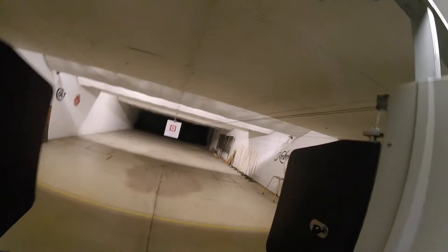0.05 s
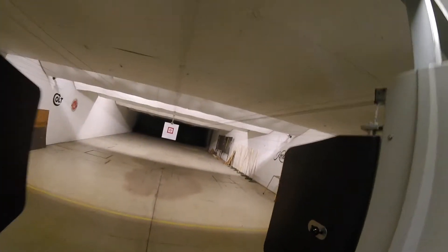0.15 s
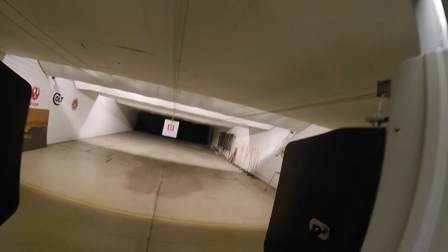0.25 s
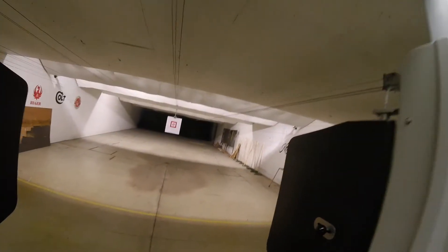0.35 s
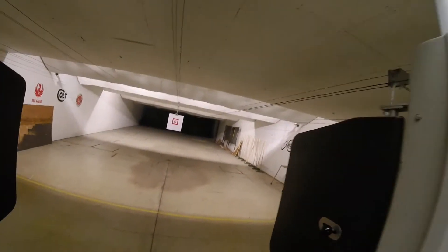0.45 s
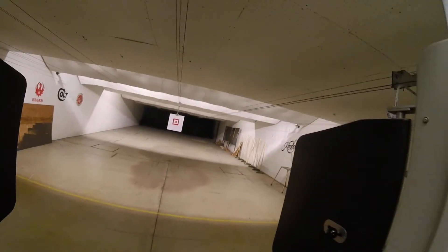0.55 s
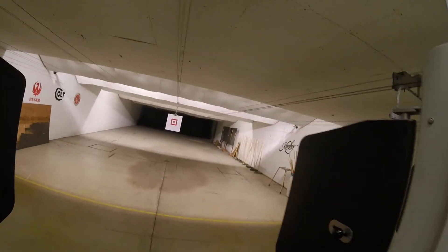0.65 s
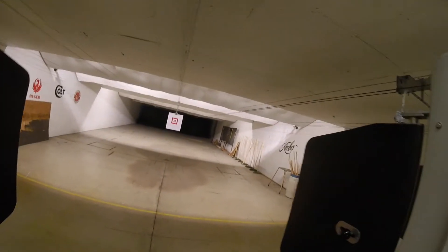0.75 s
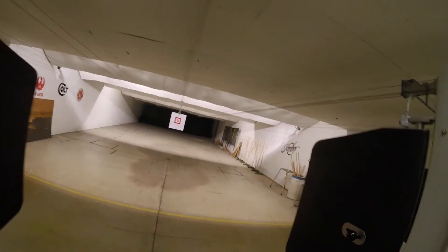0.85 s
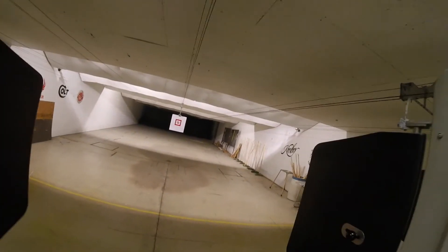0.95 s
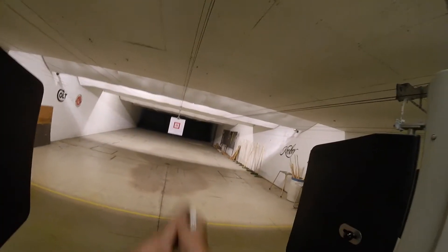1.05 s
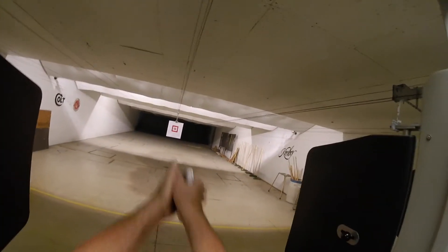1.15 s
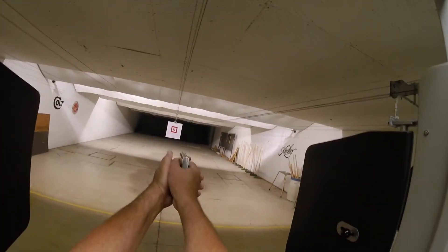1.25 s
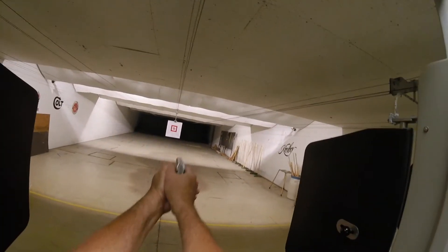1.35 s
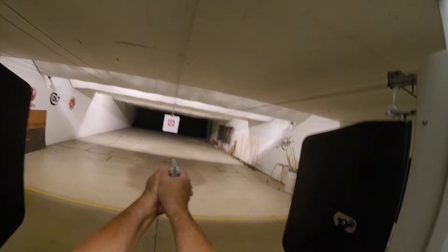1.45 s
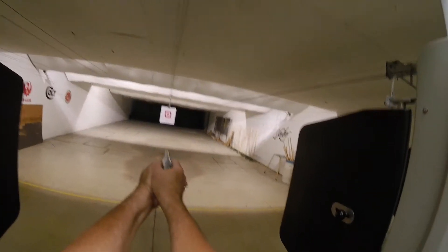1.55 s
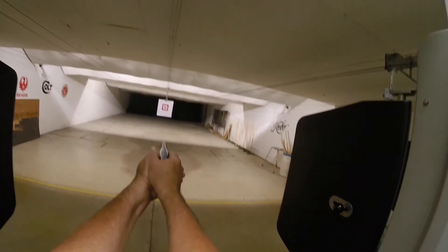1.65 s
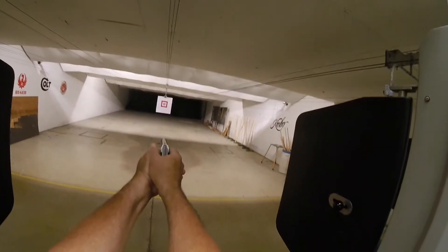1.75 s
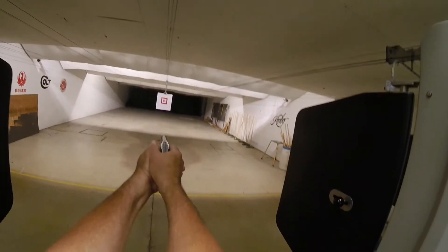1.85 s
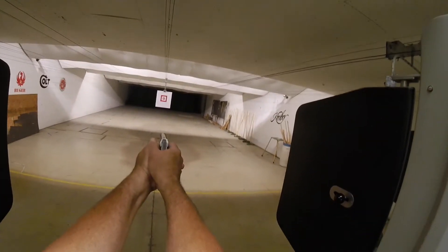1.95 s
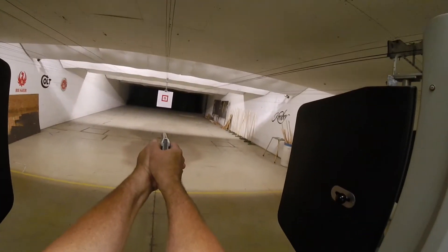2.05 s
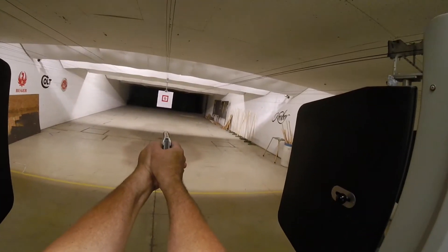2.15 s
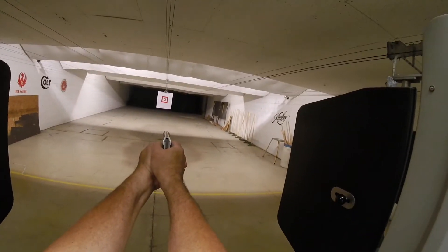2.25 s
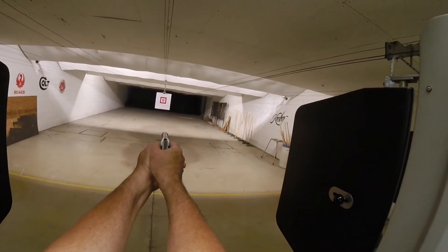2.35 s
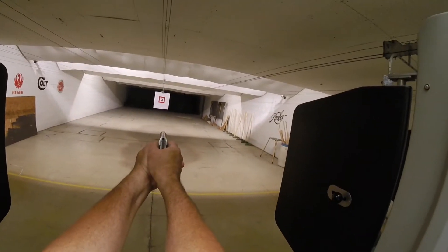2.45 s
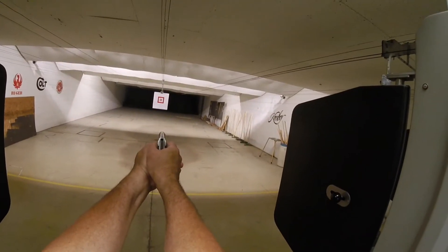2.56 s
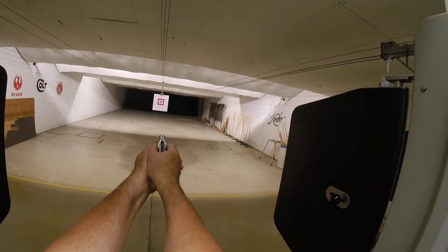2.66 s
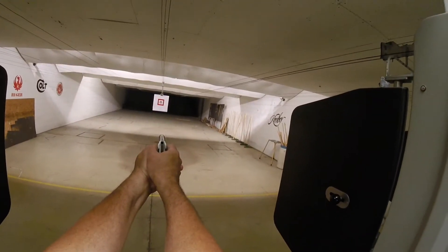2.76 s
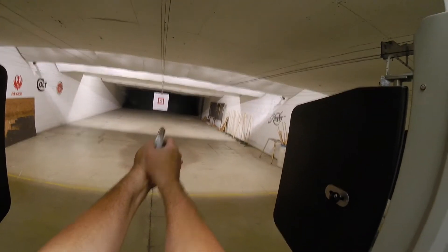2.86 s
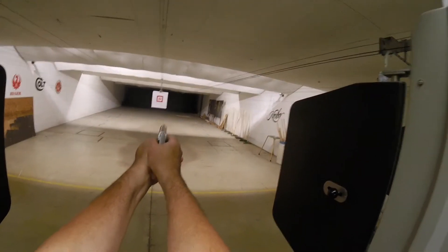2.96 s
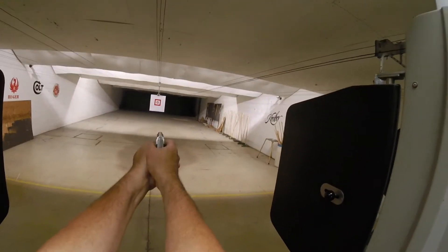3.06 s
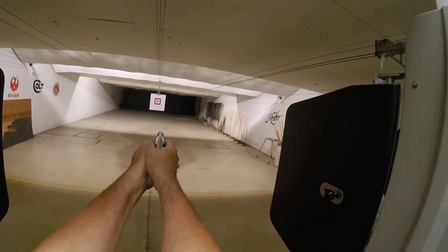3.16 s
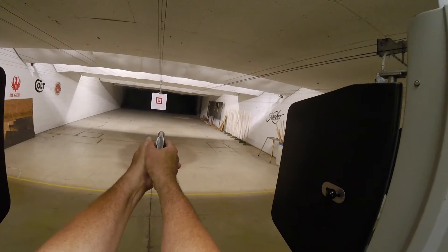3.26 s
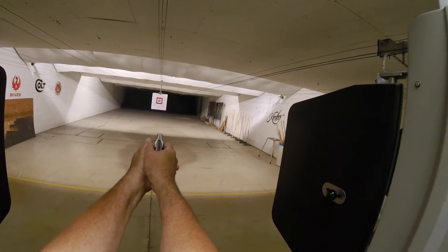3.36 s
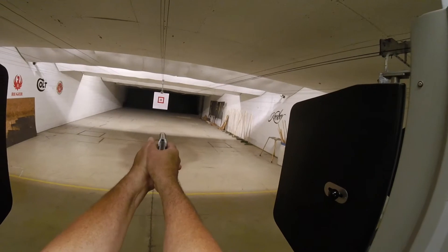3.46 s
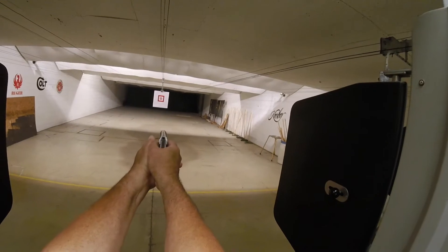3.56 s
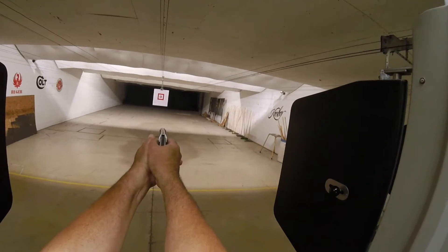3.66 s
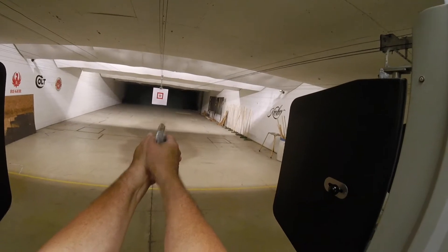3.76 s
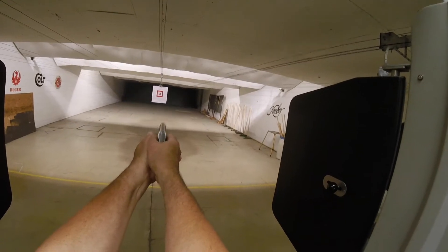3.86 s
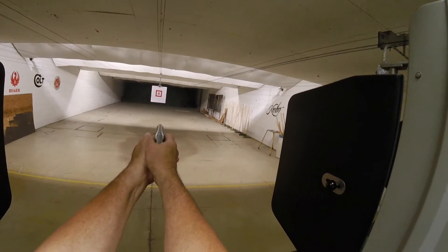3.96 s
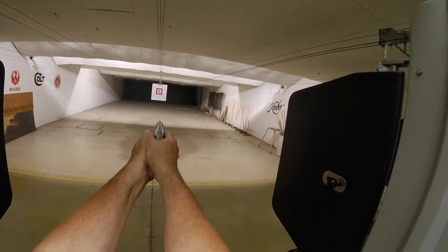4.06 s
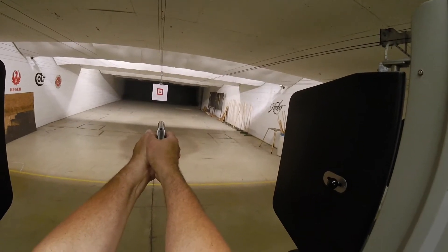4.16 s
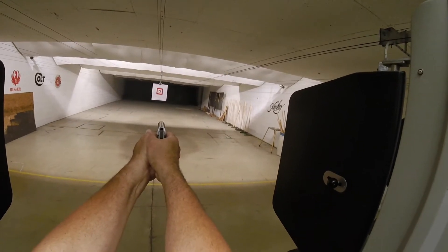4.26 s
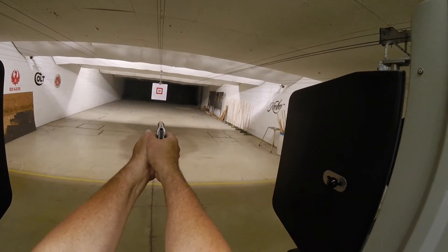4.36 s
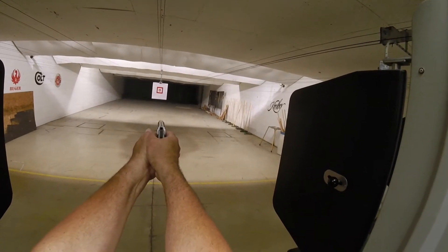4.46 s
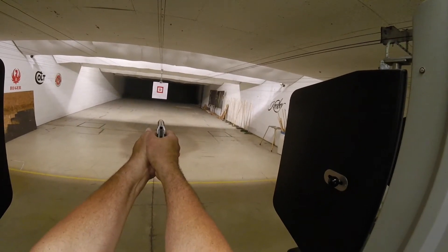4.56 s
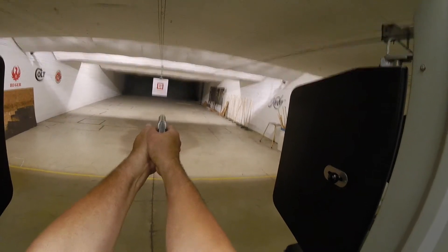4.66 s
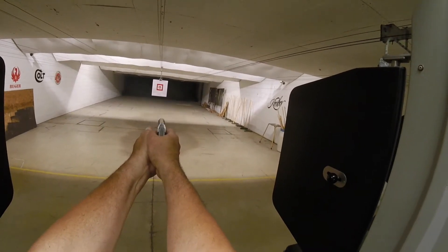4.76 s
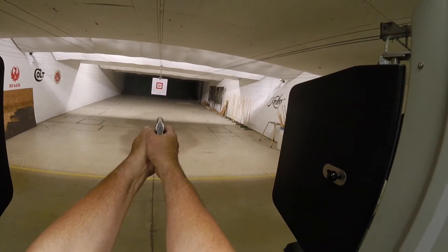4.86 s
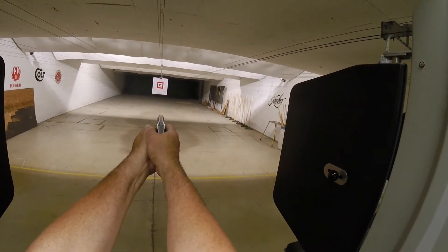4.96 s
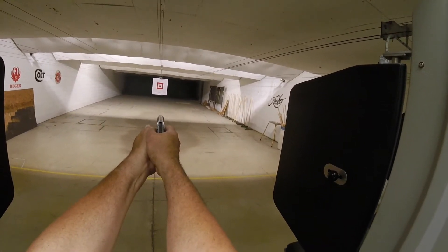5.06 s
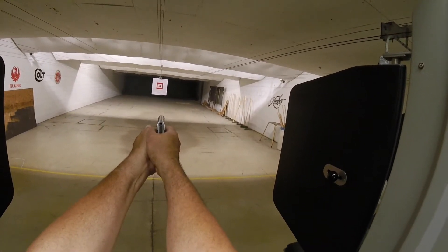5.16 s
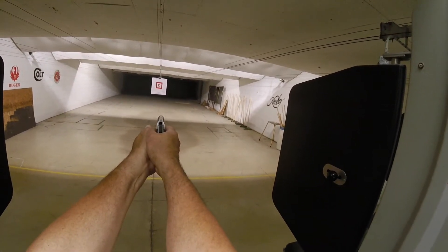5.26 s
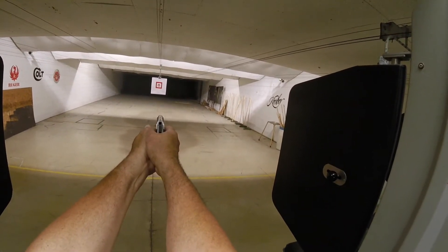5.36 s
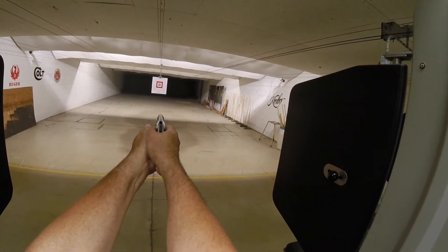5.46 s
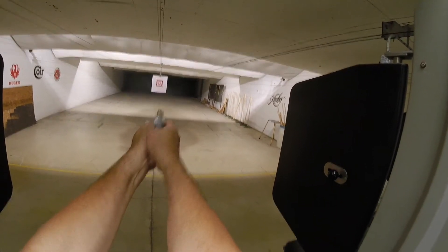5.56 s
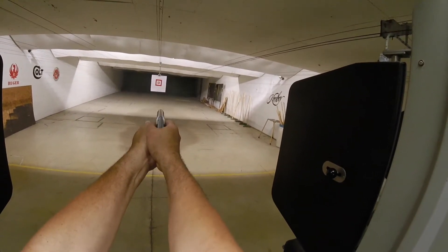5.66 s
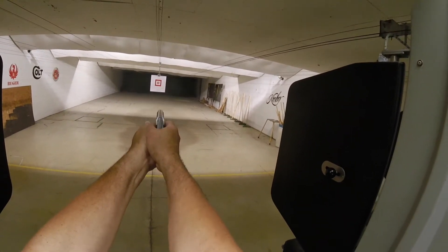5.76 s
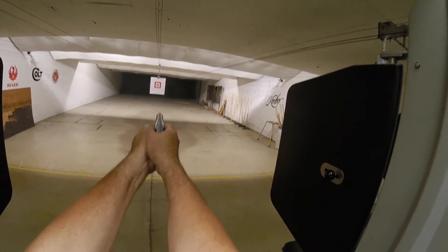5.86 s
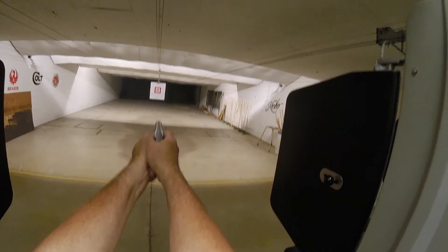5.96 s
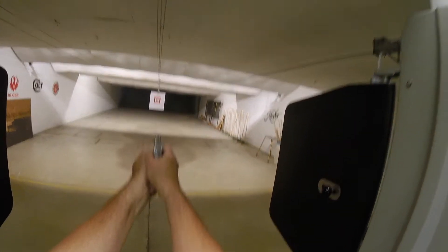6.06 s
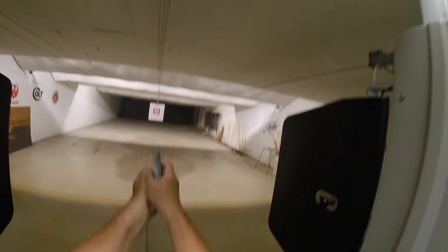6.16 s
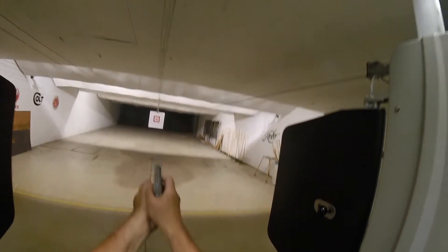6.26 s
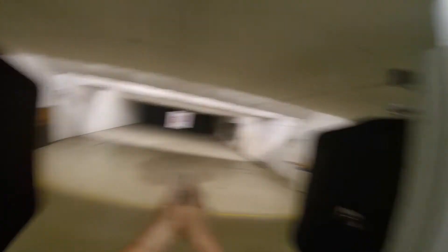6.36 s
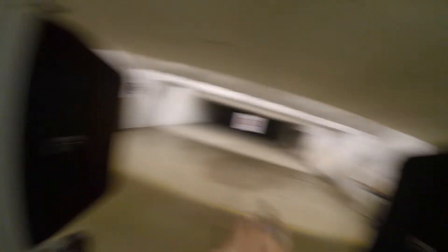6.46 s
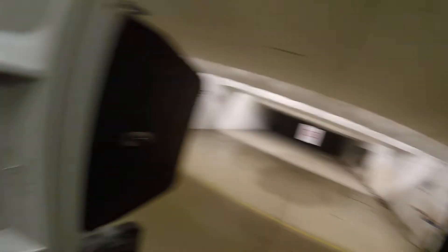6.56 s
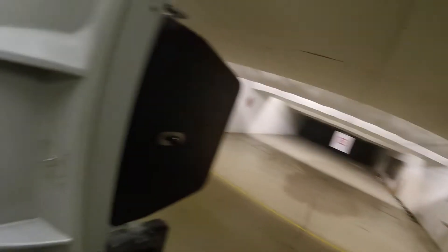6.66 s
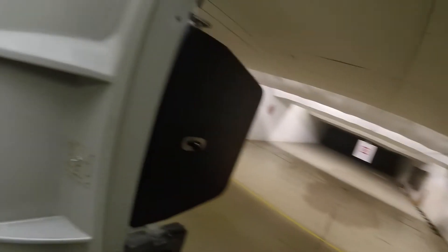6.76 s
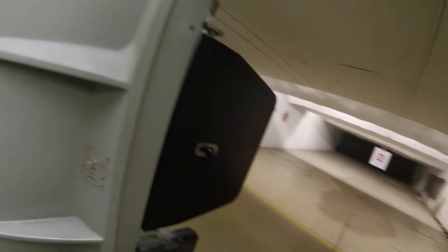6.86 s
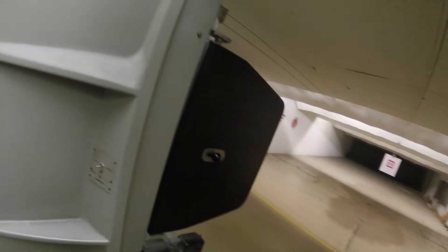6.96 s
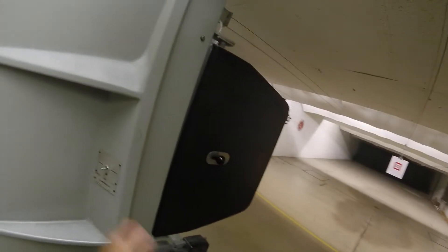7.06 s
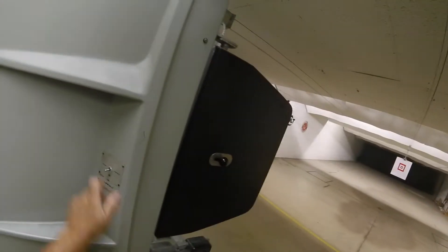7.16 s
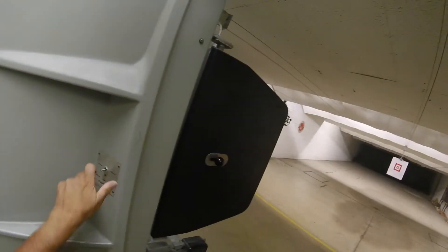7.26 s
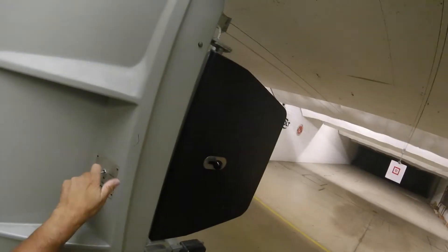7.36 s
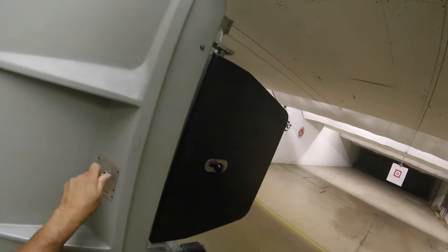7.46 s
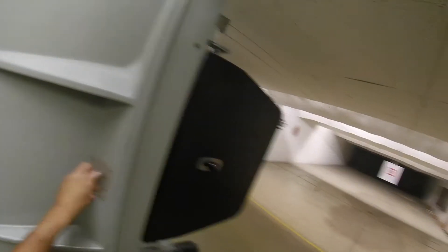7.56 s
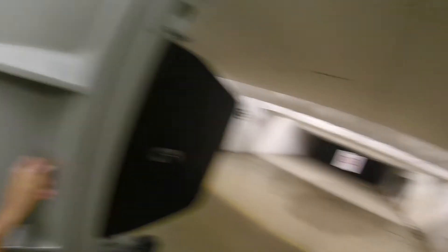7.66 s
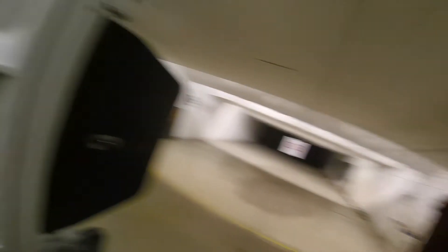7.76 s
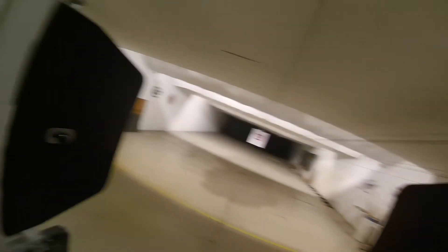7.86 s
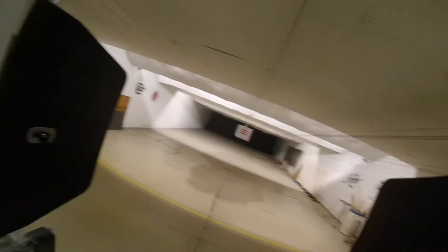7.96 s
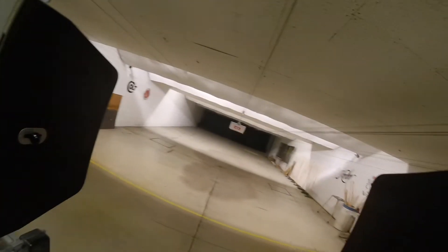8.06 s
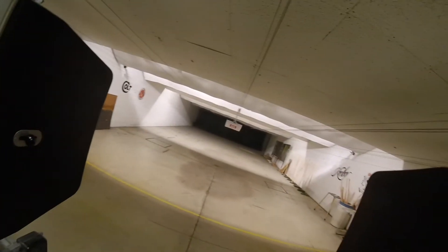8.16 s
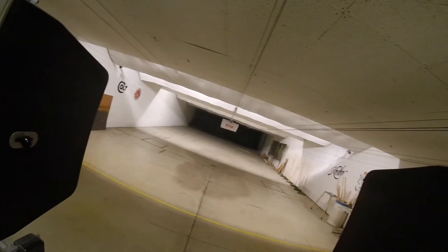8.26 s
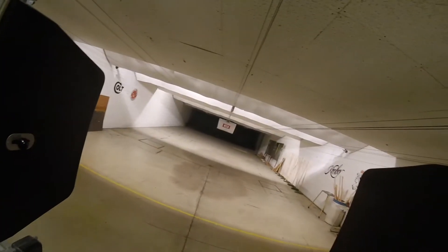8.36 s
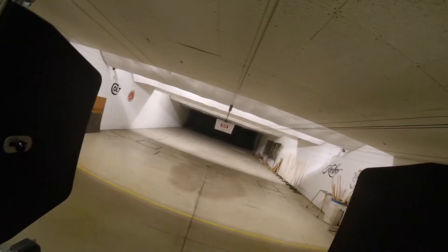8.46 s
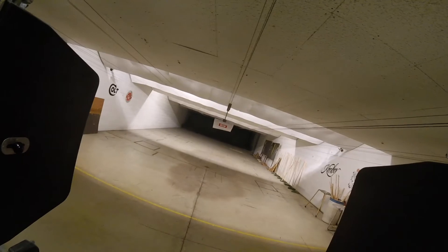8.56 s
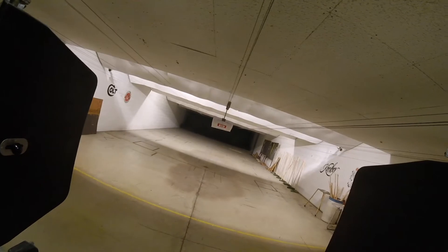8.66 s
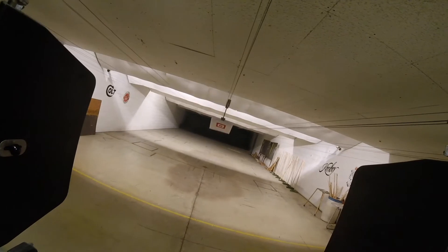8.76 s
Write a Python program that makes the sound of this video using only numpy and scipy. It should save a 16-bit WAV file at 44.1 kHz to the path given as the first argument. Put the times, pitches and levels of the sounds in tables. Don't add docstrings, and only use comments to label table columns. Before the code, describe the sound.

Inside a long concrete shooting range, a head-worn camera hears low ventilation rumble and soft hiss. After nearly three seconds a small pistol fires four evenly spaced shots, each ducking the background just before a hard, slightly squashed crack and a roar that rolls down the hall. Small clacks follow as the gun is put down, with faint high brass ringing, then a wall switch snaps and an electric motor runs up to a steady whirr.

```python
import sys
import numpy as np
from scipy import signal
from scipy.fft import rfft, irfft
from scipy.io import wavfile
from scipy.ndimage import uniform_filter1d

SR = 44100
rng = np.random.default_rng(int(sys.argv[2]) if len(sys.argv) > 2 else 0)


def voltage_ratio(level):
    return 10 ** (np.asarray(level, float) / 20)


def to_wav(sig):
    pcm = np.clip(np.atleast_2d(sig), -1, 1) * 32767
    pcm = np.round(pcm).astype(np.int16)
    wavfile.write(sys.argv[1], SR, pcm.T)


N = 388080
T = np.arange(N) / SR

# frequency in Hz, level in dB per Hz.
AIR_COLOUR = [(11, -21), (18, 1.5), (66, -8.5), (137, -18.5), (247, -28), (470, -37), (830, -43.5),
              (2000, -48.5), (3300, -54), (4500, -59), (7500, -50.5), (10000, -59.5), (12500, -59),
              (13500, -104)]
# time in seconds, level in dB.
DRAUGHT = [(0, -3), (.7, -1), (1.4, -2.5), (2.1, 0.5), (2.8, -1.5), (6.5, -4.5), (7.2, -3), (8.0, -1.5),
           (8.8, 0)]
HISS_DB = 0.25

# start in seconds, hold in seconds, level in dB, colour in Hz, dying in dB per second.
SCRAPES = [
    (0.616, 0.043, -68, 1900, 500),
    (6.847, 0.063, -46.5, 3300, 188),
    (7.198, 0.061, -68.5, 1500, 99.5),
]
SCRAPE_RISE_DB_S = 2500
SCRAPE_ROOM_DB, SCRAPE_ROOM_DB_S = -11, 54.5

# time in seconds, peak in dB, colour
# in Hz, low part in dB, time to die by 60 dB in seconds.
KNOCKS = [(1.29, -54.5, 6600, -14, 0.028), (2.6714, -51.5, 6660, -15, 0.022),
          (5.1092, -49, 2730, -12.5, 0.032), (5.3453, -37.5, 2940, -3, 0.066),
          (6.1584, -39, 3680, -7, 0.035), (6.2944, -51, 2620, 5, 0.031), (6.5126, -46, 5850, -6, 0.081),
          (6.5655, -47, 3040, -6, 0.039), (6.6472, -38, 3200, -5, 0.05), (6.6554, -40.5, 6300, -21, 0.18),
          (6.7703, -46.5, 2920, 0, 0.11), (6.7994, -50.5, 2710, -2, 0.032), (6.847, -43, 3450, -8, 0.05),
          (7.637, -45, 5880, -20.5, 0.045), (7.6488, -56, 4010, -18, 0.039),
          (7.7142, -43, 2830, -16, 0.042), (7.7191, -45.5, 2770, 10.5, 0.041),
          (7.8354, -48.5, 3020, -11, 0.038)]

# time in seconds, peak in dB, low thump in dB.
SHOTS = [
    (2.867, -12, -25.5),
    (3.788, -11.5, -28),
    (4.656, -12, -24.5),
    (5.578, -12, -18.5),
]
# frequency in Hz, level in dB per Hz.
CRACK_COLOUR = [(880, -31), (1500, -7), (2730, -0.5), (5360, 2), (6650, 3), (8670, -6.5), (10400, -24),
                (12100, -24.5), (15600, -46.5)]
# frequency in Hz, level in dB per Hz.
BOOTH_COLOUR = [(88, -25), (150, 5), (650, 0), (1480, 6), (2530, -9.5), (3210, -6.5), (4710, -11.5),
                (5160, -11), (6430, -10.5), (7590, -23.5), (8320, -20), (10400, -34.5), (12000, -38),
                (15600, -67.5), (22000, -120)]
# frequency in Hz, level in dB, time to die by 60 dB in seconds.
PANELS = [(353, -8, 0.039), (640, -8, 0.042), (1040, -3.5, 0.022), (1448, 4, 0.018), (2054, -9.5, 0.038),
          (2970, -8, 0.018)]
# frequency in Hz, level in dB per Hz.
HALL_COLOUR = [(24, -78), (40, -36.5), (62, -12), (81, -11.5), (162, -8.5), (202, -13.5), (251, -12),
               (453, -4.5), (654, -4.5), (945, -3), (2120, -15.5), (6240, -23), (8790, -36.5),
               (14000, -80.5)]
# frequency in Hz, time to die by 60 dB in seconds.
HALL_T60 = [(60, 0.86), (250, 1.92), (700, 1.544), (1500, 1.573), (3000, 1.393), (6000, 1.27), (8000, 0.77),
            (10500, 1.6), (13000, 0.3)]
SAME = 0.96

DIVE_S = [
    2.808,
    3.7355,
    4.6005,
    5.528,
]
START_DB, DEPTH_DB, SPRING_DB = -4.5, -44, -3.5
RECOVER_S = 0.78

# start in seconds, level in dB, length in seconds.
BRASS_RINGS = [
    (6.507, -75, .12),
    (6.643, -72, 0.1),
    (6.762, -67, .25),
]

# time in seconds, level in dB.
TOGGLE = [
    (7.637, -51),
    (7.648, -54),
    (7.716, -41.5),
]
# frequency in Hz, level in dB, time to die by 60 dB in seconds.
SWITCH_PLATE = [(286, 0.5, 0.058), (795, -15, 0.077), (1350, -15, 0.08), (2780, -11, .04),
                (4960, -11, 0.023)]

# frequency in Hz, width in Hz, level in dB.
HUM = [(109.7, 4, -7), (171.4, 12, -1), (199, 25, -5.5), (414, 12, -13.5), (509, 22.5, -0.5),
       (537, 19, -2.5), (620, 15, -11.5), (707, 16, -15), (753, 11, -10), (955, 38, -29)]
# frequency in Hz, width in Hz, level in dB.
WHIRR = [(1513, 42, -6), (1824, 48, -4.5), (2004, 31, -6.5), (2205, 44, -5.5), (2626, 38, 1),
         (3226, 77, -5), (3760, 110, -10), (4215, 85, -2.5), (5300, 78, -6), (5910, 90, -12),
         (6430, 70, -9), (7640, 83, -11), (8400, 70, -19), (9800, 60, -17)]
# frequency in Hz, level in dB per Hz.
RATTLE_COLOUR = [(350, -39), (600, -22), (1100, -12), (1820, -1.5), (2390, -8.5), (2630, 1.5),
                 (3950, -13.5), (4160, -13.5), (4880, -8.5), (6350, -13.5), (9060, -18), (14000, -64)]
MOTOR_ON_S, RUN_UP_S = 7.75, 0.2
HUM_DB, HUM_SLOPE_DB, HUM_WOBBLE_DB = -42.5, 16, 0.8
WHIRR_DB, WHIRR_SLOPE_DB, WHIRR_BRIGHT = -37, 90, 0.39
JOLT_DB, JOLT_T60_S = -56.5, 0.25


def level(x, db):
    return x * voltage_ratio(db) / np.sqrt(np.mean(x ** 2))


def read(table, hz):
    table_hz, value = np.transpose(table)
    return np.interp(np.log(hz + 1), np.log(table_hz), value)


def tint(x, table):
    size = x.shape[-1]
    gain = voltage_ratio(read(table, np.fft.rfftfreq(size, 1 / SR)))
    return level(irfft(rfft(x) * gain, size), 0)


def ring(x, hz, width_hz):
    return signal.lfilter(*signal.iirpeak(hz, hz / width_hz, fs=SR), x)


def dull(x, hz):
    return signal.sosfilt(signal.butter(4, hz, fs=SR, output="sos"), x)


def bands(x, top=16.0):
    size = x.shape[-1]
    spectrum = rfft(x)
    octaves = np.log2(np.fft.rfftfreq(size, 1 / SR) + 1)
    for octave in np.arange(4, top, 0.5):
        share = np.clip(1 - 2 * abs(octaves - octave), 0, 1)
        yield 2 ** octave, irfft(spectrum * share, size)


def walk(rate):
    k = int(SR / rate)
    steps = np.repeat(rng.standard_normal(N // k + 1), k)
    return 1.3 * uniform_filter1d(uniform_filter1d(steps, k), k)[:N]


def fade(t, t60):
    return (t >= 0) * np.exp(-np.log(1000) * np.maximum(t, 0) / t60)


def tones(table, t):
    return sum(voltage_ratio(db) * np.sin(2 * np.pi * hz * t) * fade(t, t60) for hz, db, t60 in table)


def add(out, s, x):
    i = int(s * SR)
    out[i:i + len(x)] += x[:N - i]


def leveller_db():
    db = START_DB * np.exp(-T / 1.0)
    for dive_s, (s, _, _) in zip(DIVE_S, SHOTS):
        since = np.maximum(T - s - 0.006, 0)
        dive_db = DEPTH_DB * np.exp(-since / RECOVER_S) + SPRING_DB * np.exp(-since / 0.0061)
        db = np.where(T >= dive_s, dive_db, db)
    return uniform_filter1d(db, int(0.0023 * SR))


def air():
    s, rumble_db = np.transpose(DRAUGHT)
    whole = tint(rng.standard_normal(N), AIR_COLOUR)
    gust = walk(5)
    whole = whole + voltage_ratio(4.5) * ring(whole, 6620, 250)
    rumble, hiss = 0, whole
    for hz, band in bands(whole, top=9.1):
        hiss = hiss - band
        buffet_db = np.clip(150 / hz, 0, 1) * (0.64 * gust + 2.0 * walk(10))
        rumble = rumble + band * voltage_ratio(buffet_db)
    moving_air = rumble * voltage_ratio(np.interp(T, s, rumble_db)) + hiss * voltage_ratio(HISS_DB)
    mains = voltage_ratio(-48.5 + 2.7 * walk(3.2)) * np.sin(2 * np.pi * 59.5 * T)
    return voltage_ratio(-39.5) * moving_air + mains


def scrapes():
    out = np.zeros(N)
    grit = rng.standard_normal(N) * voltage_ratio(1.8 * rng.exponential(size=N) + 1.0 * walk(90))
    for s, hold, db, hz, dying in SCRAPES:
        after = np.maximum(T - s - hold, 0)
        rub_db = db - SCRAPE_RISE_DB_S * np.maximum(s - T, 0) - dying * after
        room_db = db + SCRAPE_ROOM_DB - SCRAPE_ROOM_DB_S * after
        out += level(ring(grit, hz, 1.6 * hz), 0) * (voltage_ratio(rub_db) + (T > s) * voltage_ratio(room_db))
    return dull(out, 6270)


def knocks():
    out, t = np.zeros(N), T[:SR // 4]
    for s, db, hz, low_db, t60 in KNOCKS:
        a, b = rng.standard_normal((2, len(t)))
        bright = level(ring(ring(a, hz, 2.2 * hz), hz, 2.2 * hz), 0)
        low = level(ring(b, 2500, 6000), low_db)
        dying = fade(t, max(t60, 0.005)) + voltage_ratio(-13.0) * fade(t, 6 * t60)
        add(out, s, voltage_ratio(db - 5) * (bright + low) * dying)
    return dull(out, 6270)


def shots():
    out, t = np.zeros(N), T[:2 * SR]
    alike = np.sqrt(SAME) * rng.standard_normal(len(t))
    noise = alike + np.sqrt(1 - SAME) * rng.standard_normal((len(SHOTS), len(t)))

    echo = voltage_ratio(-6.5) * fade(t - 0.0058, 0.0044)
    crack = tint(noise[:, ::-1], CRACK_COLOUR) * (np.minimum(1, 3 * fade(t, 0.0095)) + echo)

    booth_fade = np.minimum(1, 1.6 * fade(t, 0.031)) + voltage_ratio(-14.5) * fade(t, 0.17)
    booth = voltage_ratio(-7) * tint(noise, BOOTH_COLOUR) * booth_fade + voltage_ratio(-1.5) * tones(PANELS, t)
    booth = booth * (1 - np.exp(-t / 0.00064))

    hall = 0
    for hz, band in bands(tint(noise, HALL_COLOUR)):
        t60 = read(HALL_T60, hz)
        hall = hall + band * (fade(t, t60) + voltage_ratio(-33.5) * fade(t, 1.13 * t60))
    hall = hall * (1 - np.exp(-t / 0.0083))

    thump = np.sin(2 * np.pi * 70 * t * np.exp(-t / 0.07)) * fade(t, 0.044)
    for k, (s, db, low_db) in enumerate(SHOTS):
        bang = voltage_ratio(4.5) * crack[k] + voltage_ratio(10.5) * booth[k] + voltage_ratio(-24.5) * hall[k]
        bang = voltage_ratio(db - DEPTH_DB) * bang + voltage_ratio(low_db + 12.5 - DEPTH_DB) * thump
        add(out, s - 0.001, bang)
    return out


def brass_rings():
    loudness = np.zeros(N)
    for s, db, length in BRASS_RINGS:
        rise = np.clip((T - s) / 0.004, 0, 1)
        stop = np.clip((s + length - T) / 0.03, 0, 1)
        loudness += voltage_ratio(db) * rise * stop * fade(T - s, 0.6)
    return loudness * level(ring(ring(rng.standard_normal(N), 12700, 300), 12700, 300), 0)


def wall_switch():
    out, t = np.zeros(N), T[:SR // 4]
    snap = sum(np.sin(2 * np.pi * hz * t) for hz in (2890, 3980, 5140, 5800)) * fade(t, 0.023)
    for s, db in TOGGLE:
        add(out, s, voltage_ratio(db) * snap)
    add(out, 7.7195, voltage_ratio(-31.0) * tones(SWITCH_PLATE, t))
    return dull(out, 6270)


def motor():
    on = slice(int(7.4 * SR), N)
    t = T[on] - MOTOR_ON_S
    speed = np.log10(np.tanh(np.maximum(t, 1e-6) / RUN_UP_S))

    def whirr_gain(hz):
        run_up_db = WHIRR_DB + WHIRR_SLOPE_DB * (hz / 2500) ** WHIRR_BRIGHT * speed
        return voltage_ratio(run_up_db) + voltage_ratio(JOLT_DB) * fade(t + 0.036, JOLT_T60_S)

    smooth, rough = rng.standard_normal((2, len(t)))
    rattle = rough * voltage_ratio(1.5 * rng.exponential(size=len(t)) + 0.76 * walk(45)[on])

    hum = sum(voltage_ratio(db) * level(ring(ring(smooth, hz, w), hz, 2 * w), 0) for hz, w, db in HUM)
    hum = level(hum, 0) + level(ring(rattle, 420, 650), -9.5)
    hum_db = HUM_DB + HUM_SLOPE_DB * speed + HUM_WOBBLE_DB * walk(14)[on]

    whirr = sum(voltage_ratio(db) * level(ring(ring(smooth, hz, w), hz, w), 0) for hz, w, db in WHIRR)
    whirr = level(whirr, -3.5) + voltage_ratio(-2) * tint(rattle, RATTLE_COLOUR)
    whirr = sum(band * whirr_gain(hz) for hz, band in bands(whirr))

    brushes = voltage_ratio(-30.5) * whirr_gain(4000) * rng.standard_normal(len(t))
    out = np.zeros(N)
    out[on] = dull(dull(hum * voltage_ratio(hum_db) * (t > 0) + whirr, 9600), 9600) + brushes
    return out


def scene():
    as_heard = scrapes() + knocks() + brass_rings() + wall_switch() + motor()
    return (air() + shots() + as_heard / voltage_ratio(leveller_db()))[None]


def roll_off(x):
    return signal.sosfilt(signal.butter(12, 15750, fs=SR, output="sos"), x)


def record(dry):
    x = dry - 0.4 * ring(dry, 5430, 1900)
    x = x + voltage_ratio(-4.5) * ring(x, 6210, 380)
    x = x * voltage_ratio(leveller_db())
    x = 0.58 * np.tanh(x / 0.58)
    x = dull(dull(dull(x, 12500), 14300), 14300)
    x = signal.sosfilt(signal.butter(1, 25, "high", fs=SR, output="sos"), x)
    return roll_off(x)


dry = scene()
out = record(dry)
to_wav(out)
```